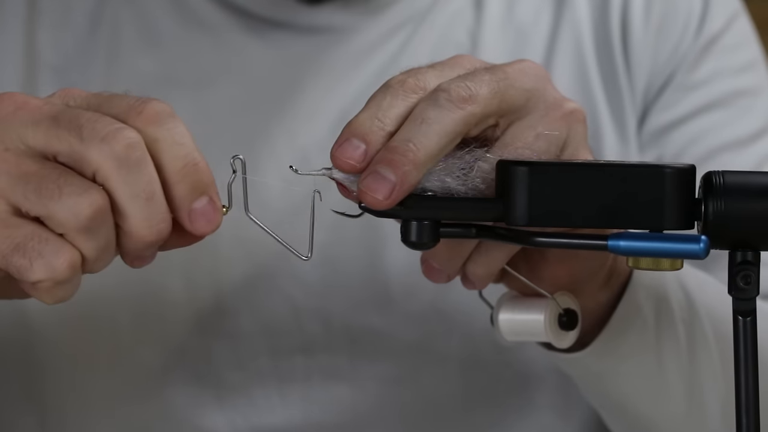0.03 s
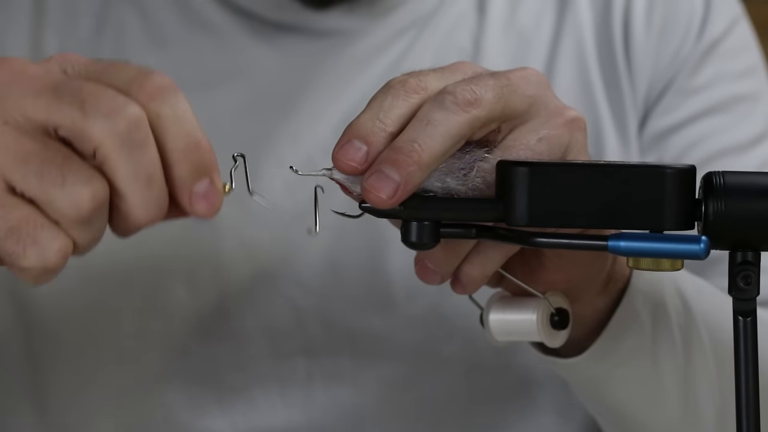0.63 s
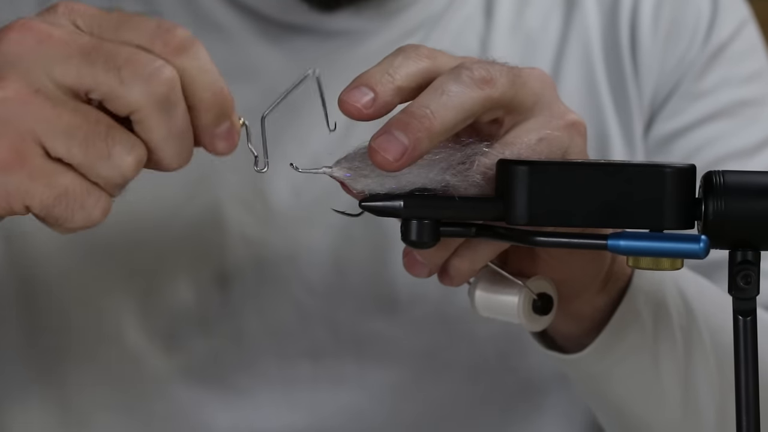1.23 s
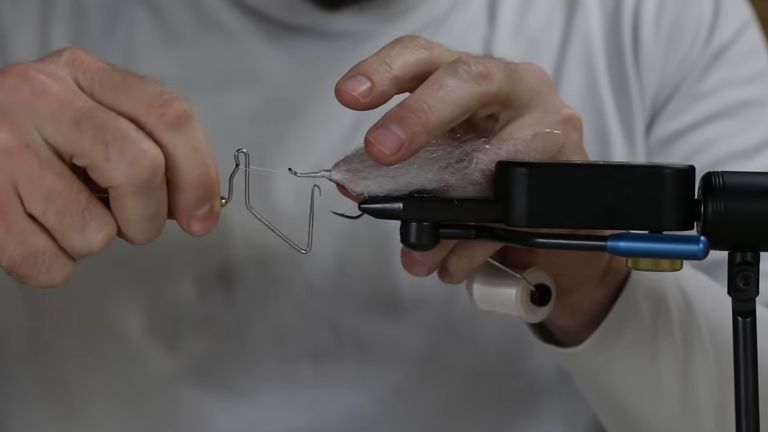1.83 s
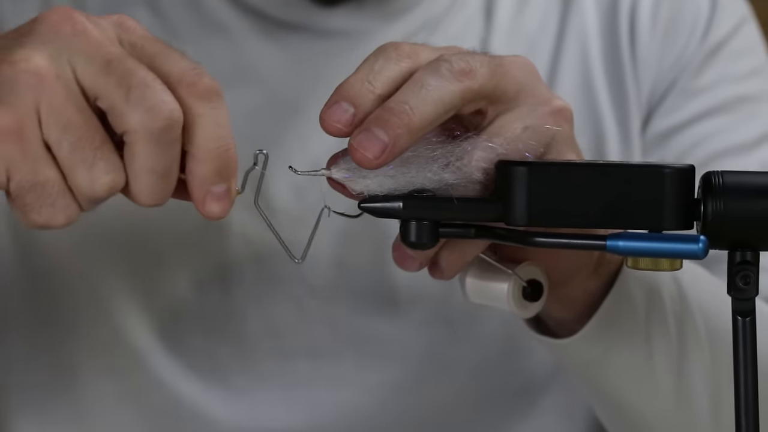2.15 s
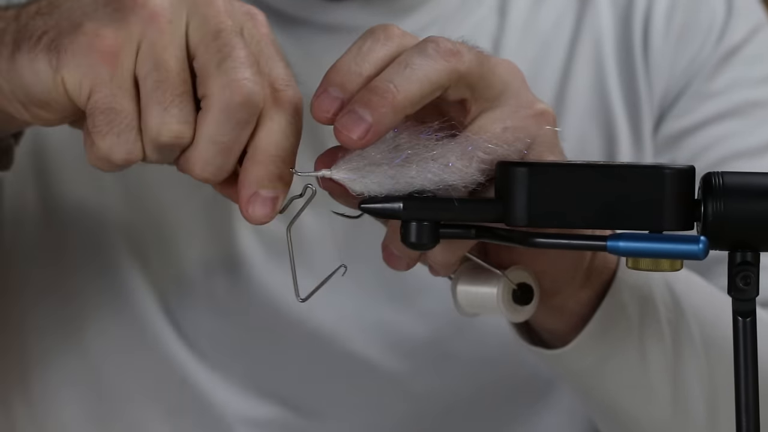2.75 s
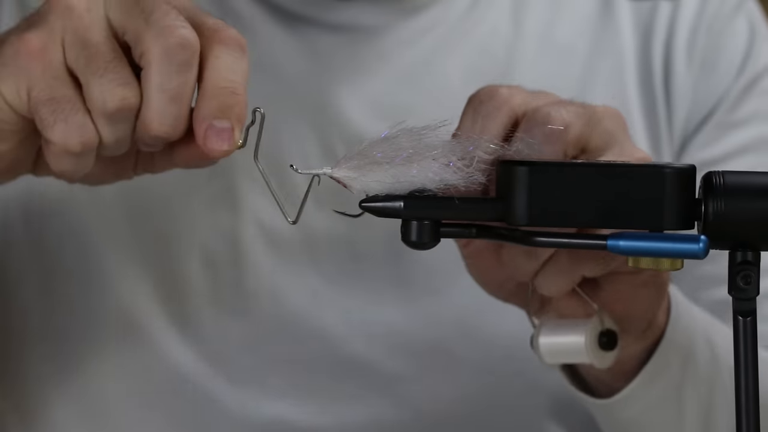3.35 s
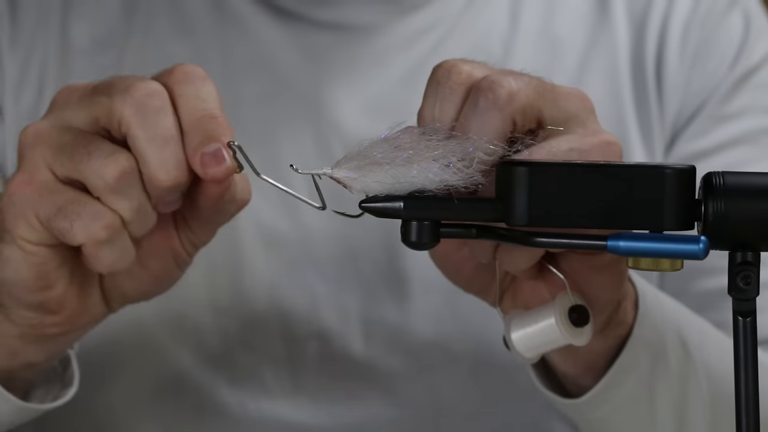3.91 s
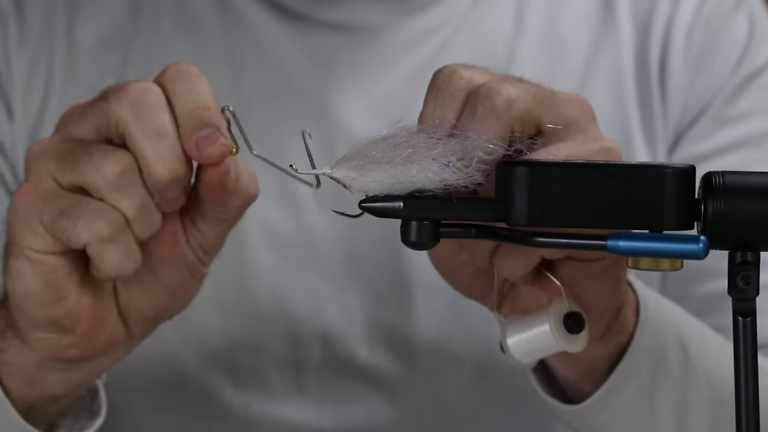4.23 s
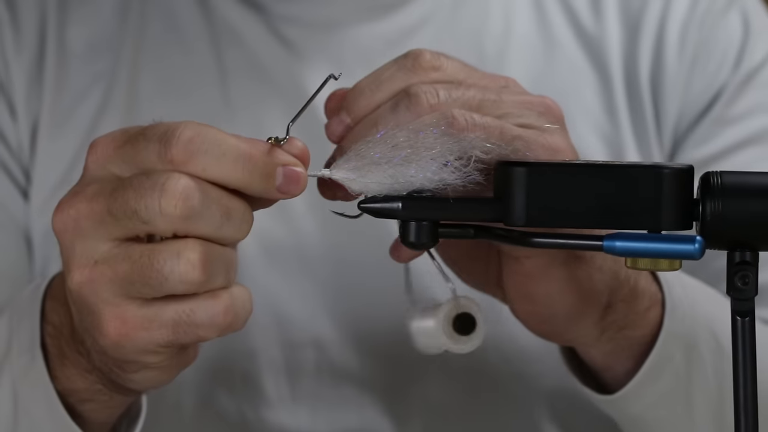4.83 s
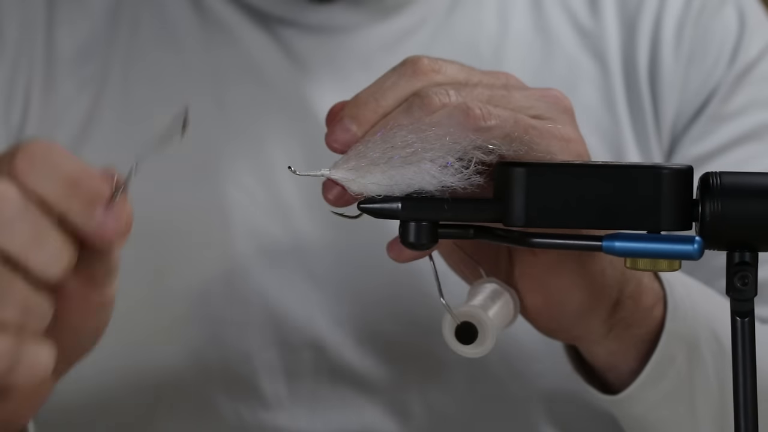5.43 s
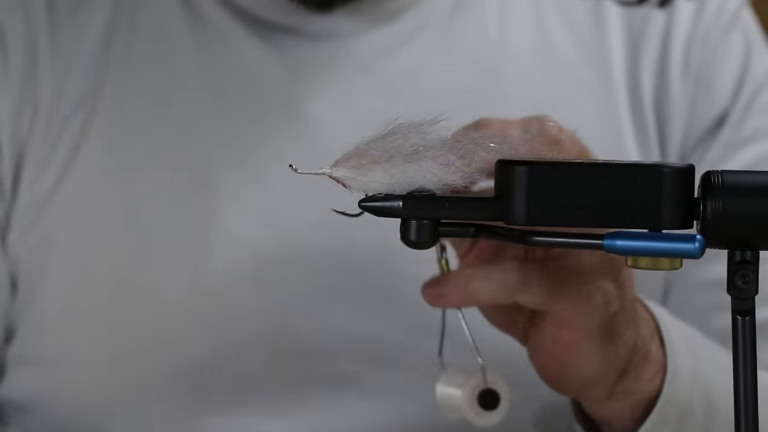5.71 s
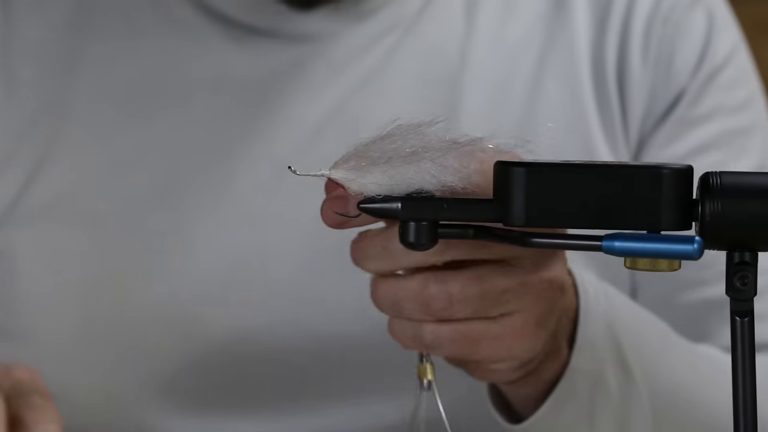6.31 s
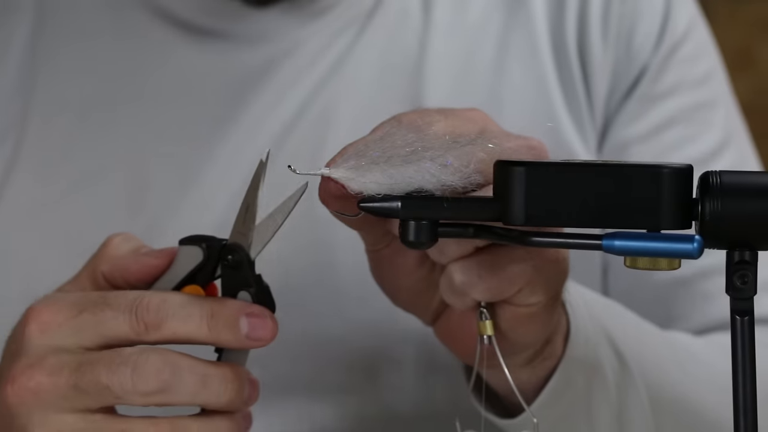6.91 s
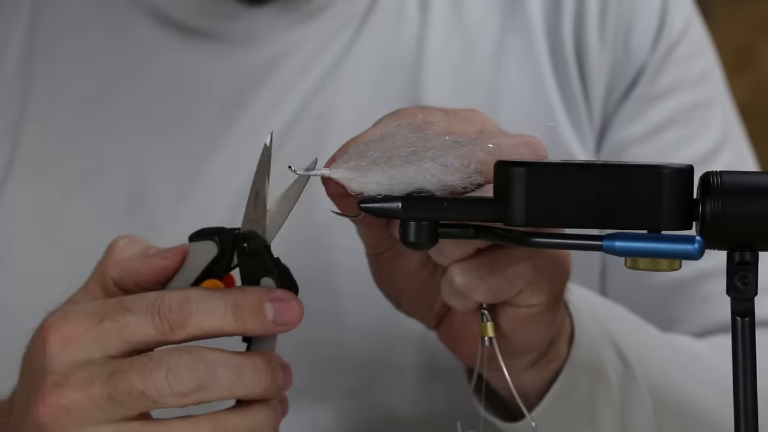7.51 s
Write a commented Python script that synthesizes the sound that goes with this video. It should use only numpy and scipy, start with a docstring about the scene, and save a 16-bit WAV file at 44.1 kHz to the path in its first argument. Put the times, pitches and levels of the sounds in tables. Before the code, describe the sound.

Very faint finger rubs and tiny thread squeaks give way to a few small clicks of a wire tool against a hook in a vise. After some muffled bumps, a thread spool ticks round softly, then the bobbin hits the desk with a short, sharp, bouncing clatter, by far the loudest sound. A light scissor tick ends it. The microphone is close, in a small quiet room with hiss, rumble and a thin electric whine.

```python
"""Tying off a fly, close up in a quiet room, over a faint electric whine, hiss and a low rumble.
First fingers brush the fly and taut thread squeaks. From 2.3 s a wire finishing tool ticks on the hook
and plucks the thread, and the vise hums with the pluck. Dull bumps follow; from 5.2 s the spool ticks
round as thread is drawn. At 5.9 s the bobbin lands on the desk, clatters, slides and settles.
One last light metal tick, like scissors touching, closes the scene."""
import sys
import numpy as np
from scipy import signal
from scipy.fft import rfft, irfft
from scipy.io import wavfile
from scipy.ndimage import uniform_filter1d

SR = 44100
rng = np.random.default_rng(int(sys.argv[2]) if len(sys.argv) > 2 else 0)


def wrap_up_sound(samples):
    """Save the sound to the file named by the first command line argument, as 16-bit audio."""
    columns = np.atleast_2d(samples).T
    # keep every value between -1 and 1, then stretch to whole-number steps
    tamed = np.clip(columns, -1, 1)
    steps = np.round(tamed * 32767).astype(np.int16)
    wavfile.write(sys.argv[1], SR, steps)


N = 333337
TIME = np.arange(N) / SR

# The room's tail. Each row: frequency in Hz, t60 in seconds.
ROOM_DECAY = [(100, 1), (400, 0.51), (1500, 0.3), (4000, 0.51), (8000, 0.36), (15000, 0.11)]
# The rumble's fader ride. Each row: time in seconds, level in dB.
RUMBLE_RIDE = [(0, -61), (1.0, -55), (1.3, -60), (2.5, -49), (3.1, -51), (3.5, -56), (3.9, -49),
               (4.55, -45), (5.0, -50), (5.7, -44), (6.7, -49), (7.56, -55)]
# Stereo width of the hiss. Each row: frequency in Hz, side against mid in dB.
HISS_WIDTH = [(60, -26), (110, -25), (200, -18.5), (380, -11), (700, -7), (1290, -5.5), (2380, -4.5),
              (4400, -0.5), (8120, -0.5), (15000, -0.5)]
# The whine's standout overtones. Each row: harmonic number, level in dB.
WHINE_PEAKS = [(8, -72.5), (9, -65.5), (10, -75.5), (11, -70.5), (12, -73.5), (15, -72), (19, -74.5),
               (20, -68), (23, -74), (26, -74.5), (29, -75), (44, -79)]

# EQ curves that colour noise. Each row: frequency in Hz, gain in dB.
HISS_EQ = [(24, -20), (40, 2), (123, -1), (659, -20), (890, -18.5), (1090, -24.5), (1170, -22),
           (1330, -21.5), (1660, -23.5), (2140, -24), (2360, -22), (2540, -26), (3030, -23.5), (4200, -26),
           (15800, -28)]
BUMP_EQ = [(60, -13), (120, 3.5), (220, -6), (330, 1.5), (480, -3), (620, -3.5), (780, -1.5), (930, -12.5),
           (1100, -1.5), (1400, -14), (2500, -17.5), (3800, -23.5), (9500, -30), (15000, -38)]
SPOOL_EQ = [(200, -9), (520, 2), (750, -3), (1150, 4.5), (1900, -10), (2650, -1.5), (3300, -19),
            (3950, -4.5), (4500, -29), (12000, -47)]
HOOK_EQ = [(100, -14), (400, -5), (750, -4.5), (1150, -2), (1600, -1), (2100, -4), (3500, -14),
           (12000, -36)]
WIRE_EQ = [(80, -17), (500, -17), (1100, -5), (1750, -7), (2500, -1), (3900, -12), (5600, -4.5), (8200, -6),
           (10000, -6.5), (11500, -5), (13500, -6.5), (16000, -4.5)]
FRAME_EQ = [(100, -24), (800, -12.5), (1850, -21), (2450, 6), (2850, -9.5), (3900, 0), (4700, -12.5),
            (7400, -9.5), (9000, -3), (10600, -18.5), (12700, -14.5), (16000, -30)]
LIGHT_SLIDE_EQ = [(200, 3), (1000, 8), (2500, -1.5), (4000, -25), (5500, -9), (9300, -1), (11300, -11),
                  (12000, -13), (12550, 0), (13200, -8), (16000, -13)]
HEAVY_SLIDE_EQ = [(200, -36), (700, -12), (1300, -2), (1900, 6), (3100, -12), (4000, -3.5), (5500, -6.5),
                  (8500, -15), (11700, -39), (12500, -9), (13200, -32), (16000, -37)]

# Resonances of struck bodies. Each row: frequency in Hz, gain in dB, t60 in seconds.
SPOOL_MODES = [(505, -1, 0.28), (1220, -2, 0.15), (2790, -6, .07), (3800, -6, .05)]
VISE_MODES = [(123.5, -8, 0.19), (145.6, -2.5, 0.19), (184, -5.5, 0.17), (253, -11.5, 0.12),
              (346, -7, 0.13), (497, -18, 0.16), (641, -16.5, 0.2)]
WIRE_MODES = [(2465, 2.5, 0.024), (2960, -3, 0.011), (7240, -2, 0.056), (7960, -17, .18), (8460, -5, 0.037),
              (12900, 0, .03)]
FRAME_MODES = [(2786, -1.5, .022), (3540, -11, 0.0066), (3890, -2.5, .016), (9000, -6, 0.018),
               (12450, -21, 0.12), (12520, -21, .1)]
DESK_MODES = [(129.3, 3, 0.51), (174.3, 0.5, 0.56), (212, 6.5, 0.25), (296.6, -1, 0.39), (413.5, 7, 0.21),
              (503, 2.5, 0.21), (744.6, 2.5, 0.23), (948, 15.5, 0.1), (1188, 13.5, 0.098),
              (1288, 18.5, 0.11), (1440, 14.5, 0.15), (1800, -7, 0.2), (2025, 4, 0.22), (2810, 3.5, 0.18)]

# Fingers brush fly and thread. Each row: start in seconds, level in dB, centre in Hz.
FINGER_RUBS = [(.340, -57, 2560), (.965, -57, 2400), (1.166, -56, 5200), (1.387, -57, 2790),
               (1.545, -60, 5030)]
# The hand nudges the vise. Each row: start in seconds, level in dB.
VISE_NUDGES = [(4.42, -48), (5.461, -42.5), (5.64, -45.5), (5.819, -50)]
# The tool works the thread. Each row: start in seconds, level in dB, t60 in seconds.
TOOL_BUMPS = [(1.386, -54.5, .1), (4.135, -39, 0.14), (4.218, -37.5, .15)]
# The spool ticks round. Each row: start in seconds, level in dB, t60 in seconds, treble in dB.
SPOOL_TURNS = [(5.172, -46.5, 0.11, 16), (5.377, -45, 0.13, 11), (5.592, -44.5, 0.15, -11),
               (5.800, -50.5, 0.19, -19)]
# Thread squeaks. Each row: start and length in seconds, level in dB, pitch in Hz, overtones in dB.
THREAD_SQUEAKS = [(.778, 0.024, -57, 4210, -12), (.955, 0.073, -60, 4370, 3)]
# Slips of the wire tool, except the last row: a light metal tick, like scissors touching. Each row:
# start in seconds, level in dB, length in seconds, then treble, vise thump, wire ring, hook knock in dB.
METAL_TICKS = [(2.2887, -30, 0.003, 1, -44, -62, -41), (2.3668, -47, .0015, 12, -73, -65, -75),
               (2.6114, -31.5, 0.0024, 24, -44, -51, -59), (2.8193, -27.5, 0.002, -1, -32, -40, -46),
               (4.366, -49, .004, -2, -66, -64, -56), (4.5450, -42.5, .0025, -4, -75, -72, -75),
               (7.5510, -40, .01, 6, -75, -70, -75)]
# The bobbin slides. Each row: start and length in seconds, top level in dB, swell in seconds,
# fade in dB per second.
BOBBIN_SCRAPES = [(5.89, .198, -31, 0.071, 91), (6.0858, 0.054, -26.5, .002, 161)]
# The bobbin's metal frame clinks. Each row: start in seconds, level in dB, length in seconds,
# treble in dB, send to the frame's ring in dB.
FRAME_CLINKS = [(5.8885, -8.5, 0.0013, 3, -6), (5.9045, -21, 0.0035, 8, -6),
                (5.9174, -11.5, 0.0011, 9, -11), (5.965, -14, 0.003, 10, 0), (6.041, -21.5, 0.0034, -4, -5),
                (6.0684, -22, 0.0032, -4, -3), (6.088, -11, .001, -15, -7), (6.243, -39, 0.0036, 4.5, -15)]
# The tone of one blow. Each row: multiple of its pitch, gain in dB.
BLOW_EQ = [(.04, -55), (.15, -45), (.28, -16.5), (.45, -9), (.7, 0), (1, 2.5), (1.25, 0), (1.5, -4.5),
           (1.9, -11), (3.2, -29.5), (5.5, -36), (11, -59)]
# The spool hits the desk. Each row: start in seconds, peak in dB, pitch in Hz, send to the boom in dB.
SPOOL_KNOCKS = [(5.906, -19, 2150, -28), (5.9200, -1, 1145, -2), (5.9648, -11.5, 2170, -2),
                (5.9865, -15.5, 1690, -1), (6.0079, -7.5, 1350, 5.5), (6.0880, -9, 1770, -23),
                (6.1358, 3.5, 1495, -12.5), (6.2390, -11.5, 1410, 1.5)]


def amp(db):
    """Turns dB into gain."""
    return 10 ** (np.asarray(db) / 20)


def unit(x):
    """Scales to rms 1."""
    return x / np.sqrt(np.mean(x ** 2) + 1e-20)


def read(points, hz):
    """Reads a curve on a log-frequency axis."""
    f, value = np.transpose(points)
    return np.interp(np.log(hz + 1e-6), np.log(f + 1e-6), value)


def add(mix, start, sound):
    """Mixes a sound in, start seconds along."""
    part = mix[round(start * SR):][:len(sound)]
    part += sound[:len(part)]


def waver(seconds):
    """Random modulation of rms 1 that changes over the given time."""
    return unit(uniform_filter1d(rng.standard_normal(N), size=max(round(seconds * SR), 1)))


def hump(centre_hz, octaves):
    """An EQ curve with one rounded peak."""
    hz = np.geomspace(30, 16000, num=120)
    return np.c_[hz, -20 * np.log10(1 + (np.log2(hz / centre_hz) / octaves) ** 2)]


def noise(eq, size, treble_db=0):
    """Noise through an EQ curve and a treble shelf, at rms 1."""
    hz = np.fft.rfftfreq(size, 1 / SR)
    shelf = treble_db * hz ** 2 / (hz ** 2 + 4500 ** 2)
    return unit(irfft(rfft(rng.standard_normal(size)) * amp(read(eq, hz) + shelf), size))


def puff(eq, rise, t60, treble_db=0):
    """A soft contact: noise that swells and dies."""
    t = TIME[:SR // 3]
    envelope = np.minimum(t / rise, 1) * amp(-60 * np.maximum(t - rise, 0) / t60)
    return noise(eq, len(t), treble_db) * envelope


def chatter(eq, length, treble_db):
    """A hard contact: milliseconds of buzz that stop abruptly, peaking near 1."""
    t = TIME[:2048]
    burst = noise(eq, len(t), treble_db) * (1 - np.exp(-t / .00026)) / (1 + (t / length) ** 6)
    return .44 * burst / np.sqrt(np.sum(burst ** 2) / (length * SR))


def ring(modes, rise):
    """Dying sines of a struck body; neighbouring modes swing against each other."""
    t = TIME[:SR // 2]
    swings = sum((-1) ** k * amp(db - 60 * t / t60) * np.sin(2 * np.pi * hz * t)
                 for k, (hz, db, t60) in enumerate(modes))
    return swings * (1 - np.exp(-t / rise))


def room(x, near_db, far_db, near_t60=.049, spread=.014):
    """Echoes off the desk, a quick scatter from things nearby, and the tail of a small room."""
    t = TIME[:SR // 2]
    signs = rng.choice([-1., 1.], (2, len(t)))
    taps = signs * (rng.random((2, len(t))) < 6000 / SR) * (t > .003)
    near = taps * amp(-60 * t / near_t60)
    hz, age, bands = signal.stft(taps * (t > .009), SR, nperseg=256)
    decay = amp(-60 * age / read(ROOM_DECAY, hz)[:, None])
    far = signal.istft(bands * decay, SR, nperseg=256)[1][:, :len(t)]
    mid, side = amp(near_db) * near / np.linalg.norm(near[0]) + amp(far_db) * far / np.linalg.norm(far[0])
    for delay, gain in [(0, 1), (.0033, .084), (.0044, .24), (.0064, .18)]:  # direct sound, then desk
        mid[round(delay * SR)] += gain
    response = np.array([mid + spread * side, mid - spread * side])
    return signal.fftconvolve(x[None], response, axes=1)[:, :N]


def hiss(level_db=-54):
    """Steady room tone, nearly mono in the bass and wide in the treble."""
    mid = noise(HISS_EQ, N)
    width = amp(read(HISS_WIDTH, np.fft.rfftfreq(N, 1 / SR)))
    side = irfft(rfft(noise(HISS_EQ, N)) * width, N)
    return amp(level_db) * np.array([mid + side, mid - side])


def rumble(pitch_hz=25.5, wander=.084, swell_db=1.5):
    """A sub tone that wanders in pitch and swells at random."""
    phase = 2 * np.pi * np.cumsum(pitch_hz * (1 + wander * waver(.0686))) / SR
    fader = amp(np.interp(TIME, *np.transpose(RUMBLE_RIDE)))
    return fader * unit(amp(swell_db * waver(.11)) * np.sin(phase))


def whine(buzz_hz=119.97, count=52, weak_db=-81.5, db_per_octave=-2, scatter_db=5):
    """Overtones of an electric buzz: a few stand out, the rest roll off with pitch."""
    strong = {round(k): db for k, db in WHINE_PEAKS}
    lowest, out = min(strong), np.zeros(N)
    for k, (phase, chance) in enumerate(rng.random((count, 2)), lowest):
        bed_db = weak_db + db_per_octave * np.log2(k / lowest) + scatter_db * (2 * chance - 1)
        out += amp(strong.get(k, bed_db)) * np.sqrt(2) * np.sin(2 * np.pi * (k * buzz_hz * TIME + phase))
    return out


def handling(spool_ring_db=-6.5):
    """Soft foley: finger rubs, nudges of the vise, dull bumps and the spool ringing as it ticks round."""
    out, spool = np.zeros(N), ring(SPOOL_MODES, rise=.0027)
    for start, db, centre_hz in FINGER_RUBS:
        add(out, start, amp(db) * puff(hump(centre_hz, octaves=.2), rise=.0042, t60=.045))
    for start, db in VISE_NUDGES:
        add(out, start, amp(db) * puff(hump(centre_hz=135, octaves=.41), rise=.0055, t60=.32))
    for start, db, t60 in TOOL_BUMPS:
        add(out, start, amp(db) * puff(BUMP_EQ, rise=.0038, t60=t60))
    for start, db, t60, treble_db in SPOOL_TURNS:
        add(out, start, amp(db) * puff(SPOOL_EQ, rise=.001, t60=t60, treble_db=treble_db))
        add(out, start, amp(db + spool_ring_db) * spool)
    return out


def thread_squeak(jitter=.038, jitter_s=.00045):
    """Taut thread sticks and slips on the wire: a thin, unsteady tone with overtones."""
    out = np.zeros(N)
    for start, length, db, hz, overtones_db in THREAD_SQUEAKS:
        t = np.arange(0, length, 1 / SR)
        phase = 2 * np.pi * np.cumsum(hz * (1 + jitter * waver(jitter_s)[:len(t)])) / SR
        tone = np.sin(phase) + amp(overtones_db) * (np.sin(2 * phase) + .8 * np.sin(3 * phase))
        add(out, start, amp(db) * np.sin(np.pi * t / length) ** 2 * unit(tone))
    return out


def metal_ticks():
    """Tool slips knock the hook, ring the wire and shake the vise; the last tick is scissor-like."""
    out, vise, wire = np.zeros(N), ring(VISE_MODES, rise=.0011), ring(WIRE_MODES, rise=.00028)
    for start, db, length, treble_db, thump_db, ring_db, hook_db in METAL_TICKS:
        add(out, start, amp(db) * chatter(WIRE_EQ, length, treble_db))
        add(out, start, amp(thump_db) * vise + amp(ring_db) * wire)
        add(out, start, amp(hook_db) * puff(HOOK_EQ, rise=.003, t60=.064))
    return out


def scrape(onset_db=-6.5, tip_at_s=6.04, tip_time_s=.014, first_weight=.22, grain_db=4, grain_s=.0014):
    """The bobbin slides lightly on its frame, then tips onto the spool; the surface catches unevenly."""
    level = np.zeros(N)
    for start, length, db, swell, fade_rate in BOBBIN_SCRAPES:
        t = np.arange(0, length, 1 / SR)
        shape_db = onset_db * np.maximum(1 - t / swell, 0) - fade_rate * np.maximum(t - swell, 0)
        add(level, start, amp(db + shape_db))
    tipped = .5 + .5 * np.tanh((TIME - tip_at_s) / tip_time_s)
    weight = np.clip(first_weight + (1 - first_weight) * tipped, 0, 1)
    friction = np.sqrt(1 - weight) * noise(LIGHT_SLIDE_EQ, N) + np.sqrt(weight) * noise(HEAVY_SLIDE_EQ, N)
    grain = unit(amp(grain_db * waver(grain_s)))
    return level * friction * grain


def rattles(count=9, from_s=5.945, to_s=6.08, db=-28.5, scatter_db=2.5, length_s=.0023, ring_db=-9):
    """Light, uneven clinks while the bobbin skitters, as rows like FRAME_CLINKS."""
    slot = (to_s - from_s) / count
    return [(from_s + slot * (k + late), db + scatter_db * (2 * strength - 1), length_s, 0, ring_db)
            for k, (late, strength) in enumerate(rng.random((count, 2)))]


def blow(pitch_hz, skew=.61, size=4096):
    """One well damped blow: a pulse of about two cycles that rises faster than it falls."""
    hz = abs(np.fft.fftfreq(size, 1 / SR))
    log_gain = np.log(amp(read(BLOW_EQ, hz / pitch_hz)))
    phase = -skew * signal.hilbert(log_gain).imag  # skew 0 is symmetric, 1 is minimum phase
    pulse = np.fft.ifft(np.exp(log_gain + 1j * phase)).real
    pulse = np.roll(pulse, size // 128)[:size // 2]
    return pulse / abs(pulse).max()


def bobbin(boom_db=-39, frame_db=-2, clink_db=-1.5):
    """The spool bounces and the desk booms; between the bounces the frame clinks and rattles."""
    out, desk, frame = np.zeros(N), ring(DESK_MODES, rise=.0028), ring(FRAME_MODES, rise=.00029)
    for start, db, hz, send_db in SPOOL_KNOCKS:
        add(out, start - .0004, amp(db) * blow(hz))
        add(out, start, amp(db + send_db + boom_db) * desk)
    for start, db, length, treble_db, send_db in FRAME_CLINKS + rattles():
        add(out, start, amp(db + clink_db) * chatter(FRAME_EQ, length, treble_db))
        add(out, start, amp(db + send_db + frame_db) * frame)
    return out


def scene():
    """Vise and desk each get their own room reverb, over the background bed."""
    at_vise = room(metal_ticks() + thread_squeak() + handling(), near_db=-9.5, far_db=-11.5)
    on_desk = room(bobbin() + scrape(), near_db=-8, far_db=-14.5)
    return at_vise + on_desk + hiss() + whine() + rumble()


def record(dry):
    """The loudest knock just clips; then a low-pass takes off the top at 16 kHz."""
    lowpass = signal.firwin(511, 16000, window=("kaiser", 9), fs=SR)
    return signal.oaconvolve(np.clip(dry, -1, 1), lowpass[None], "same")


dry = scene()
out = record(dry)
wrap_up_sound(out)
```